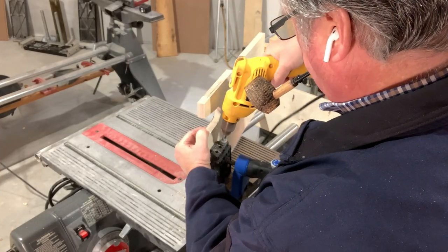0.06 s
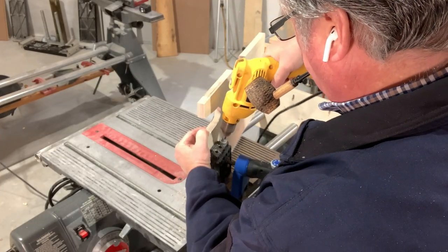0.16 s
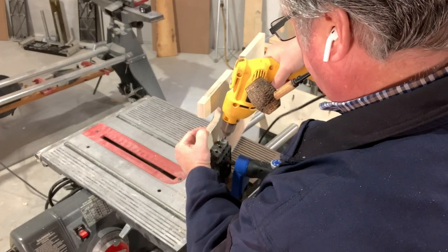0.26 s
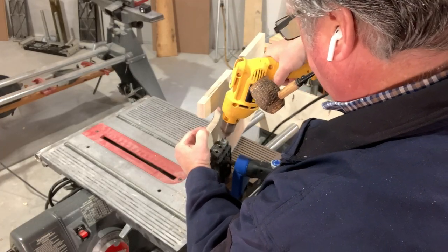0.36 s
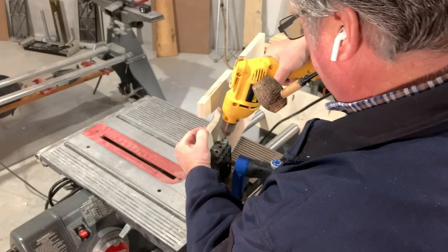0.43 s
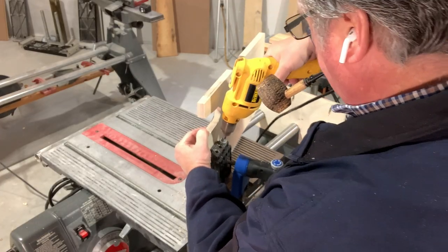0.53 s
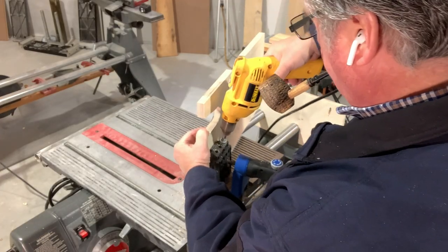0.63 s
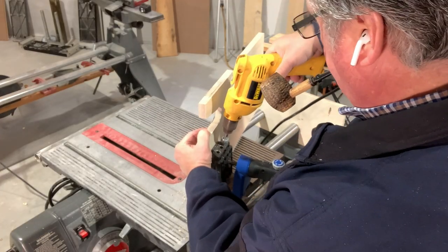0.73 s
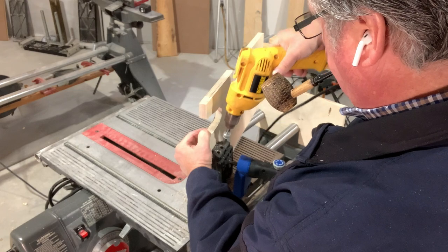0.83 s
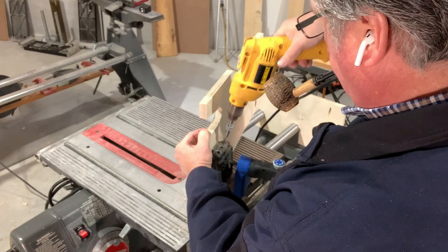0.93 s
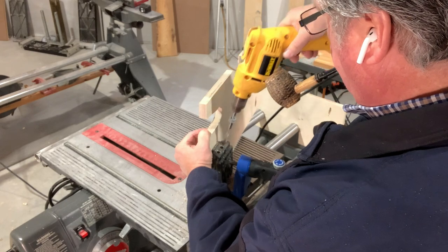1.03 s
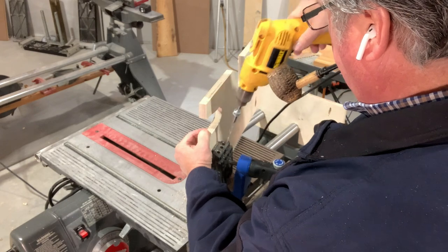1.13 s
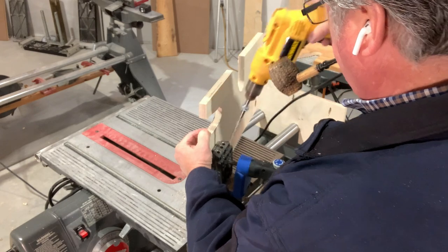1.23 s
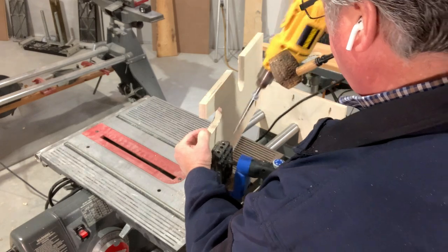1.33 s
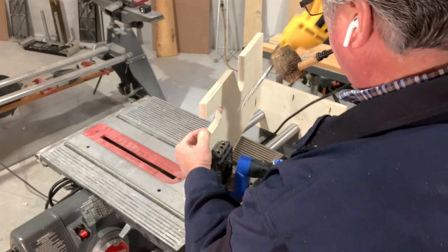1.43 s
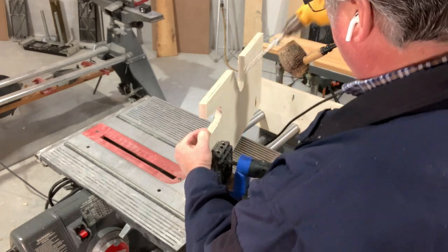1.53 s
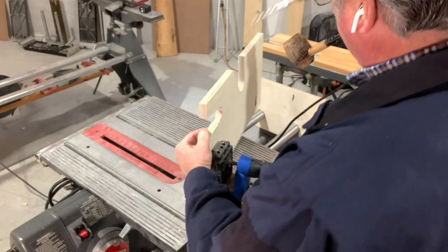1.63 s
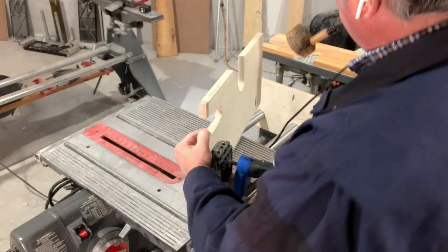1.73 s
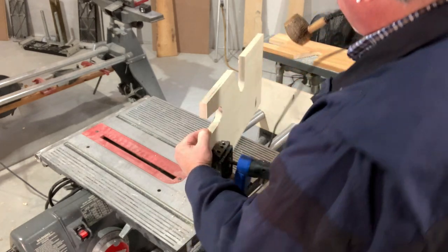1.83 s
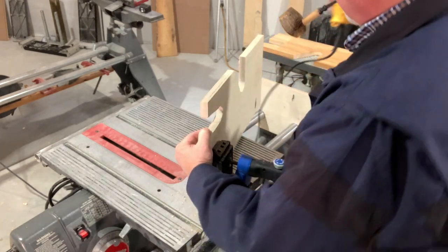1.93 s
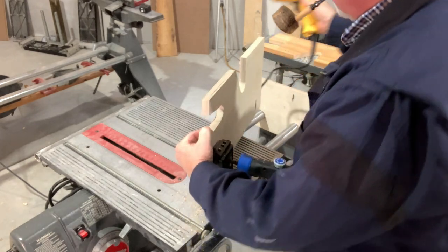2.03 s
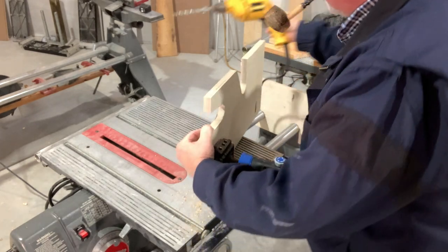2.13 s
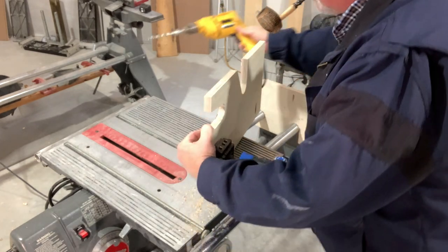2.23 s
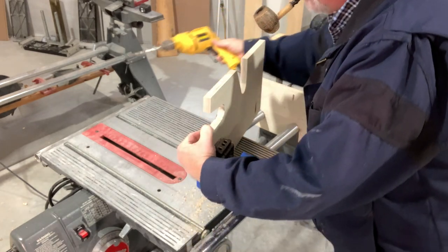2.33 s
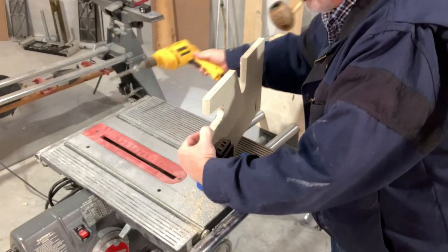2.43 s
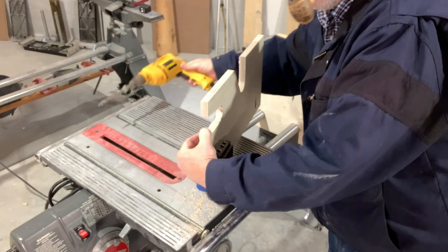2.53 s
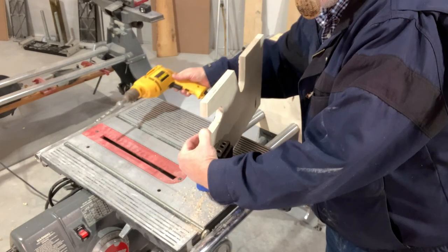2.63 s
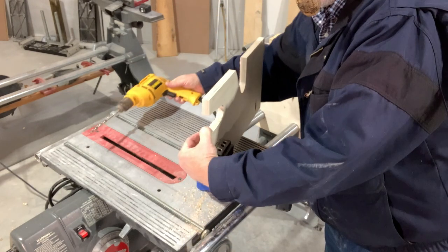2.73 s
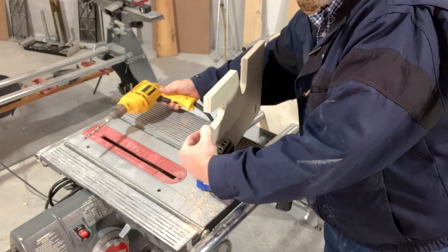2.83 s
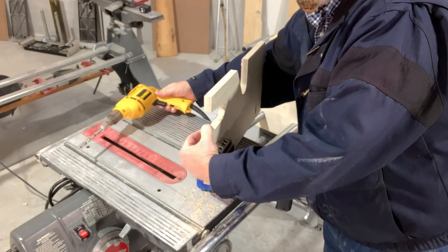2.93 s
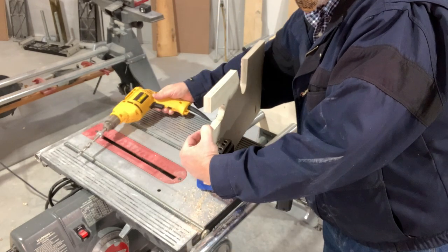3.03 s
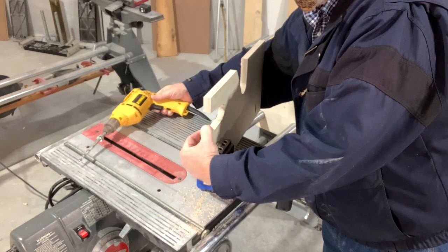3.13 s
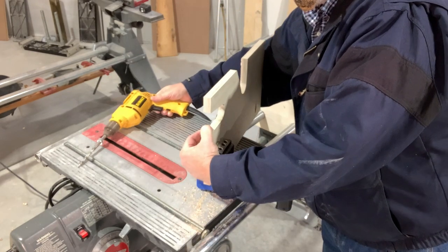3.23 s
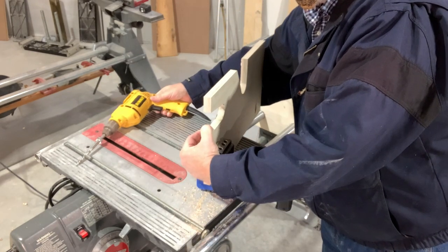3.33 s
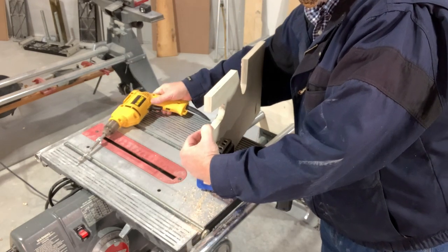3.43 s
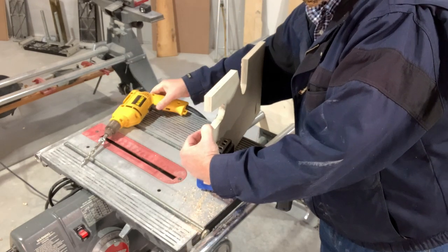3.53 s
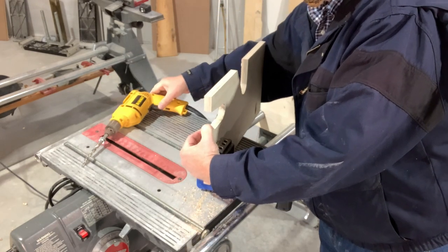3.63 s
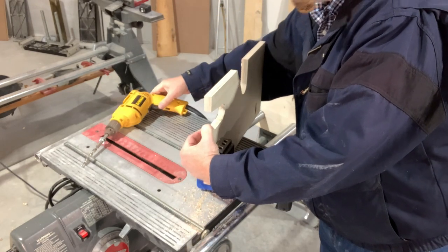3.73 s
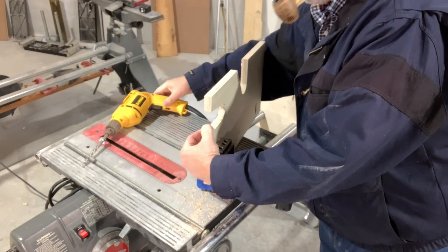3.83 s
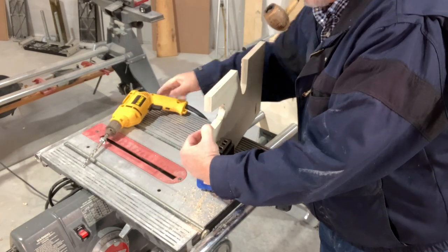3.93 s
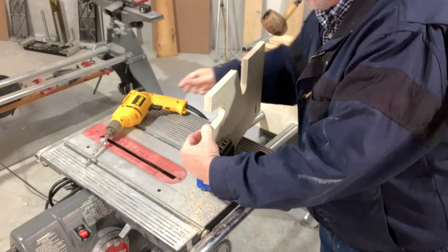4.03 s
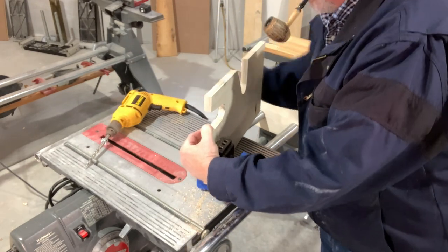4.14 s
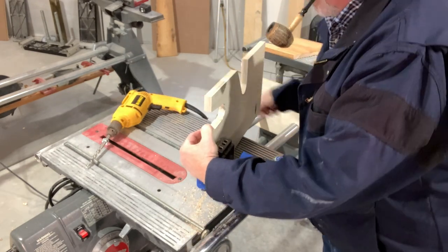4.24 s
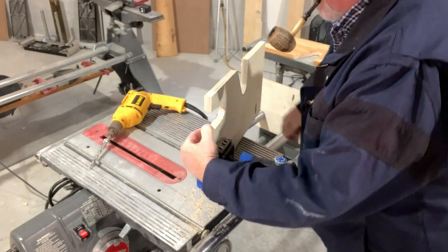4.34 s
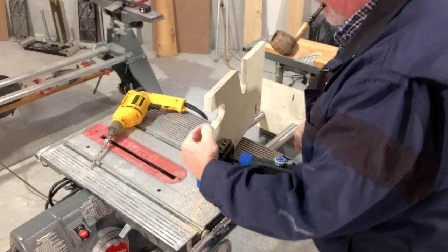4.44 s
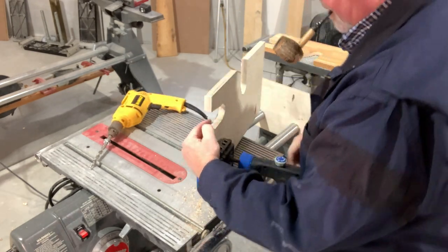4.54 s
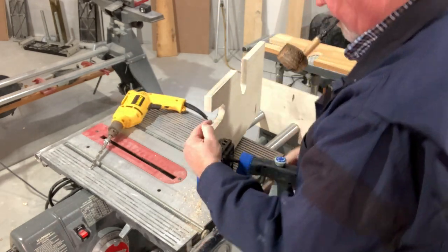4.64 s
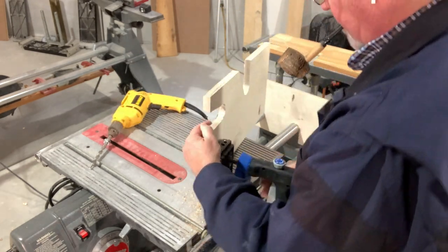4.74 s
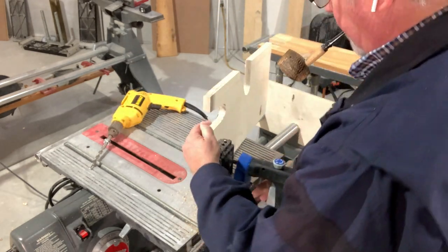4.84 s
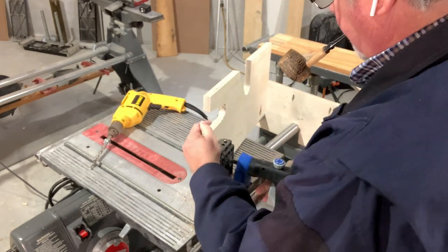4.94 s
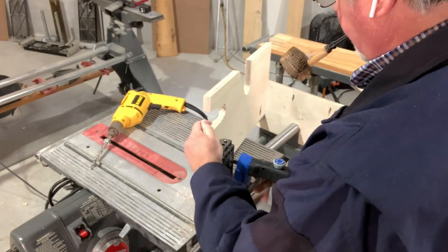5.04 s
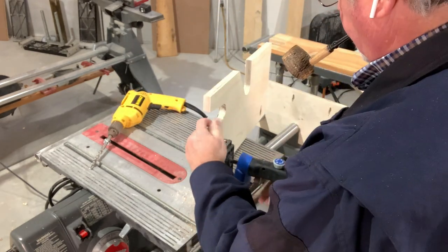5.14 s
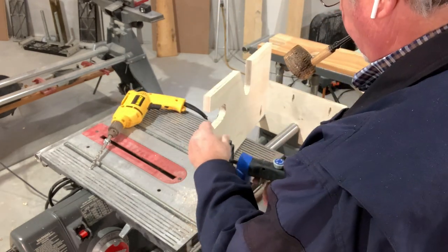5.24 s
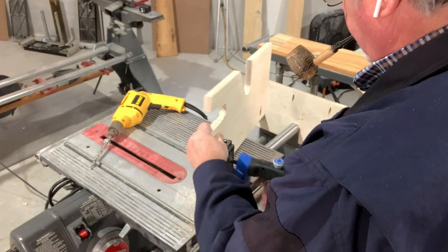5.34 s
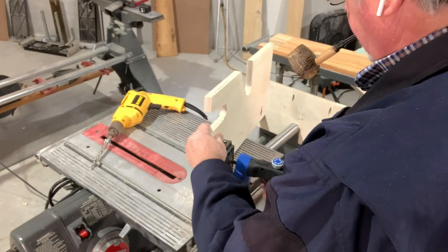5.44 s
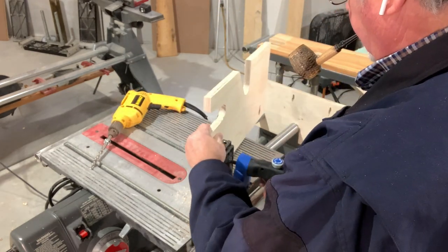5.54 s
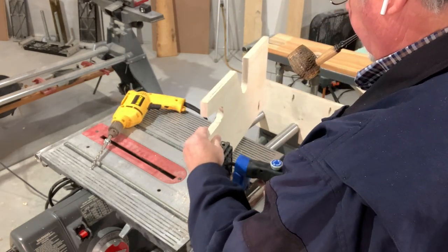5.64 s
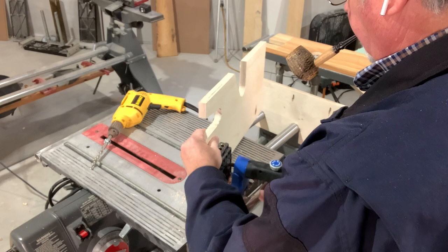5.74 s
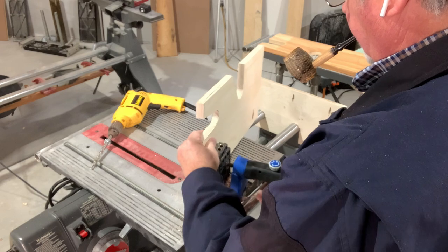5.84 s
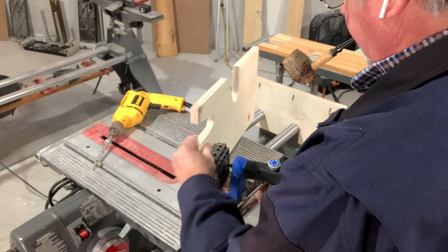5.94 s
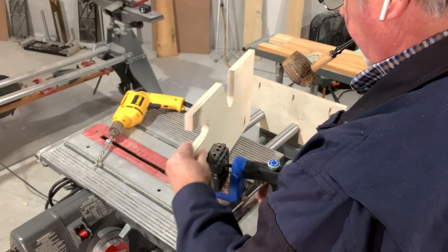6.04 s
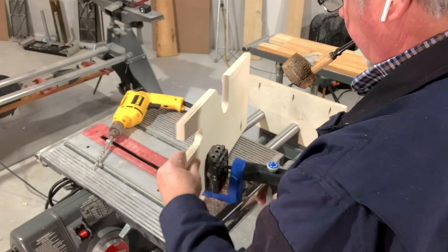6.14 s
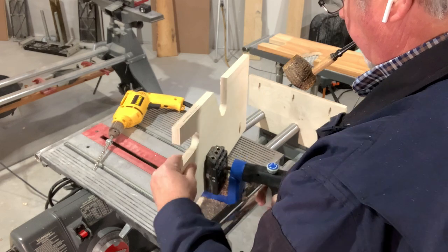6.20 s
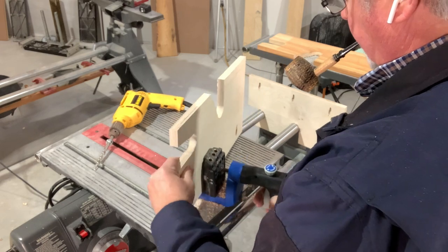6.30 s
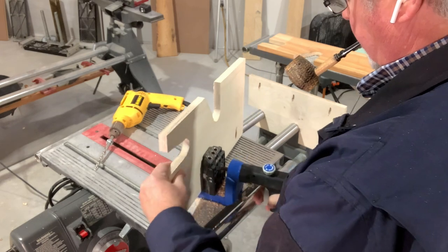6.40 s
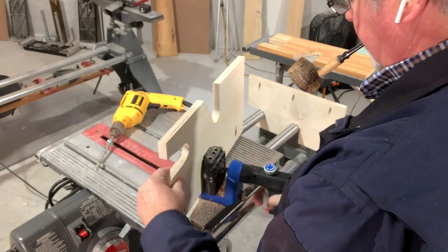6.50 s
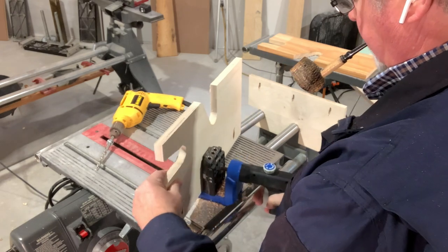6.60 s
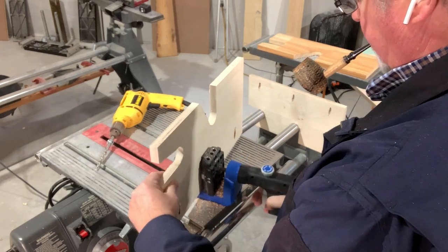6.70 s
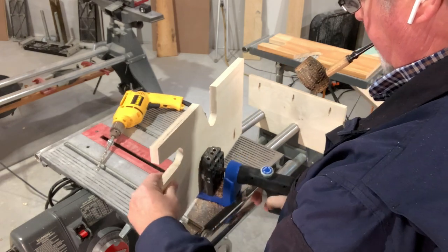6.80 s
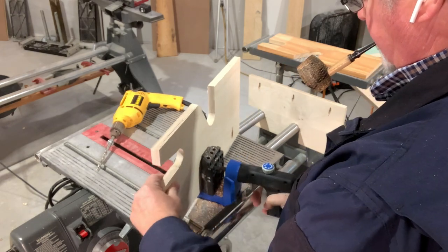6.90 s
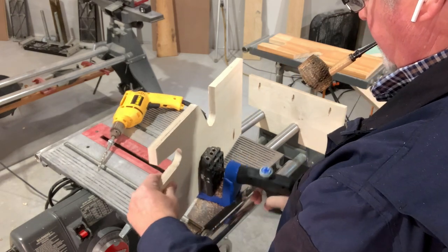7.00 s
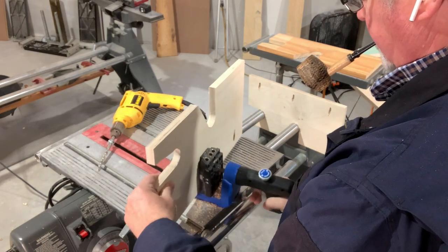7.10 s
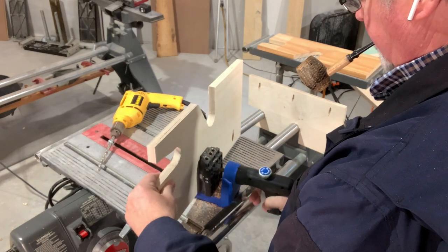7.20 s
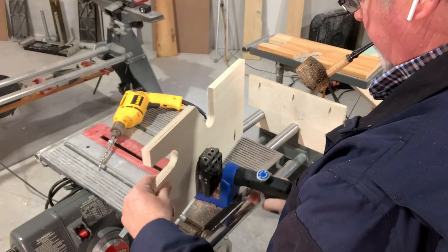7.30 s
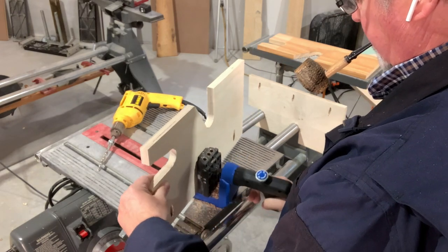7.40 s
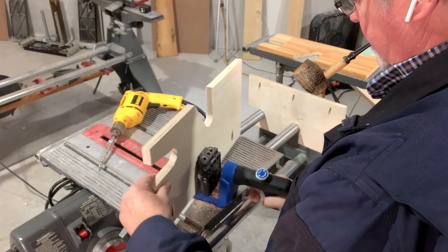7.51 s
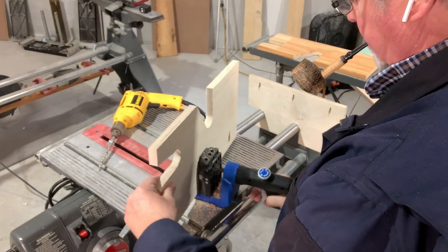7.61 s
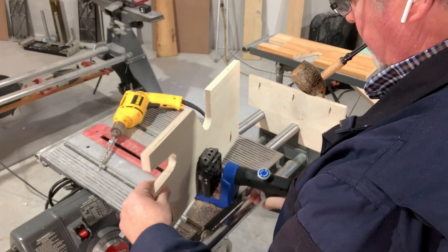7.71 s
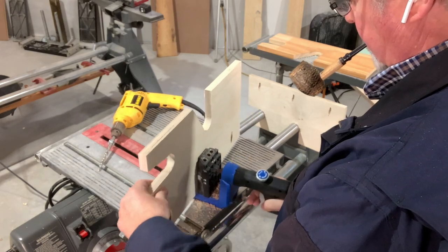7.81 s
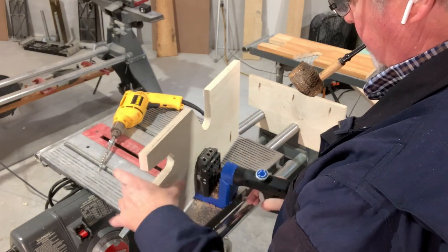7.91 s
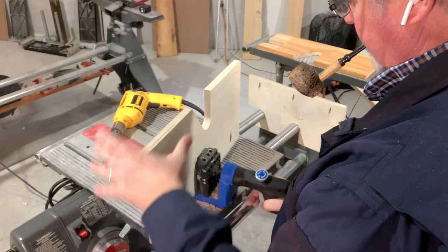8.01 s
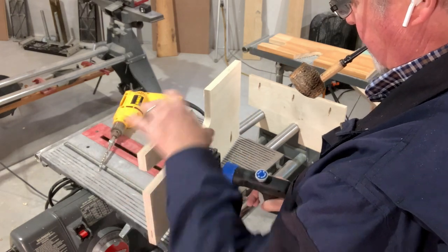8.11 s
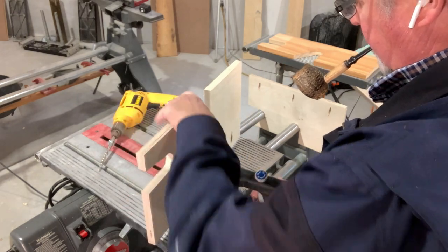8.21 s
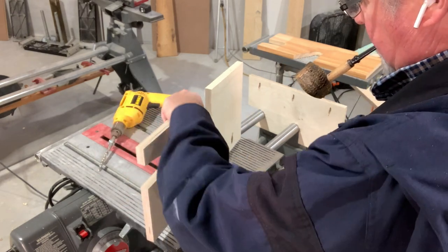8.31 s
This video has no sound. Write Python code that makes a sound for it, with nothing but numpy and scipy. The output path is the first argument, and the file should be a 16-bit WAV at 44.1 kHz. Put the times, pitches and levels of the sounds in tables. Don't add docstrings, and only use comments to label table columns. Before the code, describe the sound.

A corded drill finishes boring plywood, whines down and is laid on a metal table, then a clamp snaps and a board scrapes and knocks.

```python
import sys
import numpy as np
from scipy import signal
from scipy.fft import rfft, irfft
from scipy.io import wavfile
from scipy.ndimage import uniform_filter1d

SR = 44100
rng = np.random.default_rng(int(sys.argv[2]) if len(sys.argv) > 2 else 0)


def bounce(signal):
    frames = np.transpose(np.atleast_2d(signal))
    limited = np.clip(frames, -1, 1)
    pcm = np.round(limited * 32767).astype(np.int16)
    wavfile.write(sys.argv[1], SR, pcm)


def magnitude_from_level(level_db):
    exponent = np.asarray(level_db, float) / 20
    return 10 ** exponent


N = 368676
TRIGGER_OFF = 1.1

# frequency in Hz, level in dB per Hz.
AIR_SPECTRUM = [(5000, -26), (8000, -4.5), (12000, -3), (16000, -0.5)]


def evened(x):
    return x / np.sqrt(np.mean(x ** 2) + 1e-20)


def read(points, hz):
    f, value = np.transpose(points)
    return np.interp(np.log(hz + 1), np.log(f + 1), value)


def curves(rows, fade=.05):
    s, *columns = np.transpose(rows)
    t = np.arange(N) / SR
    since_start = t - s[0] + (s[0] < fade)
    until_end = s[-1] - t + (s[-1] > N / SR - fade)
    gate = np.clip(np.minimum(since_start, until_end) / fade, 0, 1)
    return [np.interp(t, s, c) for c in columns] + [gate]


def coloured(x, spectrum):
    gain = magnitude_from_level(read(spectrum, np.fft.rfftfreq(len(x), 1 / SR)))
    return evened(irfft(rfft(x) * gain, len(x)))


def noise():
    return rng.standard_normal(N)


def wander(size):
    return evened(uniform_filter1d(uniform_filter1d(noise(), size), size))


def resonate(x, modes):
    total = 0
    for hz, width, db in modes:
        b, a = signal.iirpeak(hz, hz / width, SR)
        total = total + magnitude_from_level(db) * evened(signal.lfilter(b, a, x))
    return evened(total)


def ring(modes, shorten):
    t = np.arange(SR // 3) / SR
    return sum(magnitude_from_level(db - 60 * t / (shorten * min(t60, .9))) * np.sin(2 * np.pi * hz * t)
               for hz, db, t60 in modes)


def shop(x, early_db=5, early_s=0.035):
    # frequency in Hz, t60 in s.
    decay = [(200, 1.6), (530, 1.1), (1390, 0.96), (3680, 0.68), (9700, 0.36)]
    taps = np.zeros(SR)
    at = np.arange(200, SR - 20, 20)
    taps[at + rng.integers(0, 20, len(at))] = rng.choice([-1., 1.], len(at))
    hz, t, z = signal.stft(taps, SR, nperseg=256)
    near_walls_db = early_db * np.exp(-t / early_s)
    z = z * magnitude_from_level(-60 * t / read(decay, hz)[:, None] + near_walls_db)
    tail = signal.istft(z, SR, nperseg=256)[1]
    return signal.fftconvolve(x, tail / np.linalg.norm(tail))[:N]


def background():
    # time in s, level in dB.
    rumble_levels = [(0.0, -50.5), (0.5, -51), (1.3, -56.5), (2.2, -50), (3.8, -56), (5.1, -48.5),
                     (5.95, -40), (7.5, -37), (8.36, -43.5)]
    # frequency in Hz, width in Hz, level in dB.
    room_modes = [(57, 42, 5.5), (98, 52, 0.5), (131, 8.3, -2), (40, 59, -9), (75, 42, -10.5)]
    # frequency in Hz, level in dB.
    fan_hum = [(58, 1), (93, -1)]
    # time in s, rise in dB.
    bumps = [
        (2.3, 6),
        (3.05, 11),
        (5.47, 3),
    ]
    # frequency in Hz, level in dB per Hz.
    hiss_spectrum = [(82, -34), (140, -1), (171, -14.5), (230, 0.5), (572, -14.5), (726, -10),
                     (1060, -18.5), (1190, -18), (14500, -39.5), (16000, -47)]
    hiss_db, bump_s = -56, 0.04
    hum_on_s, hum_before = 5.6, 0.21
    t = np.arange(N) / SR
    rumble_db, _ = curves(rumble_levels)
    rumble_db = rumble_db + sum(db * np.exp(-((t - s) / bump_s) ** 2) for s, db in bumps)
    hum = 0
    for hz, db in fan_hum:
        level = magnitude_from_level(db + 1.5 * wander(size=6000))
        hum = hum + level * np.sin(2 * np.pi * hz * t + .5 * wander(size=9000))
    share = hum_before + (.92 - hum_before) * np.clip((t - hum_on_s) / .3, 0, 1)
    boom = resonate(resonate(noise(), room_modes), room_modes)
    rumble = np.sqrt(1 - share ** 2) * boom + share * evened(hum)
    return magnitude_from_level(rumble_db - 3.0) * rumble + magnitude_from_level(hiss_db) * coloured(noise(), hiss_spectrum)


def drones():
    # start in s, end in s, first frequency in Hz, last frequency in Hz, level in dB.
    motors = [
        (1.2, 3.6, 70, 70, -54),
        (2.7, 5.6, 97, 97, -56),
        (5.6, 8.6, 128, 107, -50),
    ]
    t, out = np.arange(N) / SR, 0
    for start, end, first, last, db in motors:
        swell = np.clip(np.minimum(t - start, end - t) / .3, 0, 1)
        level = swell * magnitude_from_level(db + 3 + 2.5 * wander(size=4000))
        hz = np.interp(t, [start, end], [first, last])
        out = out + level * np.sin(2 * np.pi * np.cumsum(hz) / SR)
    return out


def rubs():
    # frequency in Hz, level in dB per Hz.
    scrape_spectrum = [(500, -33), (1500, -3), (2500, -3.5), (3100, 2), (3600, 0.5), (4600, -5),
                       (6800, -2.5), (10000, -13.5)]
    # loudest moment in s, swell in s, fade in s, fizz in dB, scrape over it in dB.
    strokes = [(3.236, .02, .02, -50, 14), (4.528, .018, .29, -63, 7), (4.74, .035, .14, -66, -6),
               (4.935, .01, .3, -64.5, 9.5), (5.07, .14, .3, -59, -12), (5.148, 0.15, .13, -53, 7.5),
               (5.334, .03, .055, -68, 6), (5.748, .075, .3, -63, 9.5), (5.99, .05, .6, -58, 11),
               (6.09, .03, .3, -61, 14), (6.16, .015, 1.2, -53, 3), (6.47, .1, .025, -61, 11),
               (6.516, .05, .075, -65, 12), (6.606, .03, .12, -58.5, 2.5), (6.812, .12, .085, -72.5, 15.5),
               (6.922, .04, .07, -66, 3), (7.09, .025, .04, -53.5, 5), (7.38, .03, .055, -61, 4.5),
               (7.448, .04, .065, -73, -2), (7.612, .012, .1, -63.5, 0), (7.706, .07, .025, -57.5, 3.5),
               (7.764, .013, .11, -67, 1), (8.36, .3, .1, -66, -4)]
    stroke_db = 20
    seated_s = 6.365
    grains = noise() * magnitude_from_level(2.6 * wander(size=60))
    fizz, scrape = coloured(grains, AIR_SPECTRUM), coloured(grains[::-1], scrape_spectrum)
    t = np.arange(0, N / SR, .002)
    s, swell, fade, fizz_db, scrape_db = np.transpose(strokes)[:, :, None]
    distance = np.maximum((s - t) / abs(swell), (t - s) / abs(fade))
    pressure = magnitude_from_level(fizz_db - stroke_db * distance)
    pressure *= (s > seated_s) | (t < seated_s)
    bright = np.interp(np.arange(N) / SR, t, np.linalg.norm(pressure, axis=0))
    dull = np.interp(np.arange(N) / SR, t, np.linalg.norm(pressure * magnitude_from_level(scrape_db), axis=0))
    dry = bright * fizz + dull * scrape
    return dry + .4 * shop(dry)


def blows():
    # weight under 1.8 kHz in dB, crack to 6 kHz in dB, tick above in dB.
    hits = [(2.238, -17, -25, -35.5, -50), (2.268, -20, -32.5, -30.5, -55), (2.359, -20, -43.5, -28, -36),
            (2.96, -13.5, -28, -28, -46.5), (3.27, -6, -41.5, -19, -18.5), (3.307, -31, -39.5, -33, -33),
            (3.58, -16, -30, -29.5, -55.5), (4.527, -41, -50.5, -45, -45.5), (4.723, -43, -48, -49, -61),
            (4.751, -41, -50, -50, -64), (5.085, -48, -57, -44.5, -45), (5.127, -43, -46.5, -58, -65),
            (5.405, -8.5, -15, -17, -17), (5.748, -56, -46.5, -43.5, -51), (5.843, -4.5, -13, -17, -20),
            (6.064, -21.5, -32.5, -32.5, -33), (6.248, -29, -42, -40.5, -64),
            (6.385, -15.5, -22.5, -28.5, -30), (6.939, -50, -50, -62, -71), (7.098, -49, -44, -50, -58.5),
            (7.207, -46, -52.5, -67.5, -79), (7.376, -54, -48, -57, -61), (7.701, -35, -49.5, -48.5, -59),
            (8.322, -41, -53.5, -49.5, -57)]
    # frequency in Hz, level in dB, t60 in s.
    board_modes = [(321, 7, 5.0), (493, -6.5, 0.41), (785, 9.5, 5.0), (1000, 10, 0.2), (1078, -12.5, 0.18),
                   (1308, -14, 0.3), (1798, -32, 5.0), (2132, -15, 0.28)]
    # low edge in Hz, high edge in Hz.
    bands = [(230, 600), (600, 1750), (1750, 6000), (6000, 15300)]
    rattle_s = [0.0075, 0.005, 0.0037, 0.0087]
    fuller = [4, 4, 1, 1.5]
    thud_db = -4.5
    direct, push, t = np.zeros(N + SR), np.zeros(N + SR), np.arange(SR // 8) / SR
    rise = 1.1 - np.exp(-t / .003)
    board = ring(board_modes, shorten=0.11)[:len(t)]
    soft = signal.butter(2, 9500, fs=SR, output="sos")
    filters = [np.vstack([signal.butter(3, edges, "band", fs=SR, output="sos"), soft]) for edges in bands]
    for s, peak_db, body_db, crack_db, tick_db in hits:
        at = slice(round(s * SR), round(s * SR) + len(t))
        chance = rng.random((2, len(t)))
        clicks = (chance[0] < 1200 / SR) * np.sign(chance[1] - .5) + 0.093 * (chance[1] - .5)
        levels_db = [body_db + thud_db, body_db, crack_db, tick_db]
        blow = magnitude_from_level(levels_db[0] - 27.0) * board
        for db, fuller_db, band, length in zip(levels_db, fuller, filters, rattle_s):
            rattle = signal.sosfilt(band, clicks * np.exp(-t / length) * rise)
            blow += magnitude_from_level(db + fuller_db) * rattle / np.linalg.norm(rattle)
            impulse = signal.sosfilt(band, signal.unit_impulse(len(t)))
            push[at] += magnitude_from_level(db + 23.5) * impulse / np.linalg.norm(impulse)
        direct[at] += magnitude_from_level(peak_db) * blow / abs(blow).max()
    return direct[:N], push[:N]


def struck_metal():
    # frequency in Hz, level in dB, t60 in s.
    table_modes = [(214, -8.5, 0.25), (1105, -8, 0.93), (1106, -16, 0.6), (2940, 10, 0.1), (4920, -13, .12),
                   (6400, -4.5, 0.12), (7400, -10.5, 0.26), (8820, -6, .1)]
    # time in s, level in dB.
    table_hit = (3.269, -22)
    # frequency in Hz, level in dB, t60 in s.
    jig_modes = [(662, 0, .4), (2190, -7, .45), (385, 0, .3), (310, 2, .3)]
    # time in s, level in dB.
    jig_hits = [(2.245, -33), (2.27, -33), (2.965, -38), (5.848, -26), (6.066, -33.5), (6.388, -27.5),
                (4.74, -56), (6.525, -45), (7.715, -54.5)]
    table, jig = ring(table_modes, shorten=0.75), ring(jig_modes, shorten=0.79)
    out = np.zeros(N + SR)
    for body, (s, db) in [(table, table_hit)] + [(jig, hit) for hit in jig_hits]:
        out[round(s * SR):][:len(body)] += magnitude_from_level(db) * body
    return out[:N]


def struck_room(push):
    # frequency in Hz, width in Hz, level in dB.
    wood_modes = [(321, 52, 5.5), (380, 35, 2), (484, 51, 4), (660, 27, 1.5), (853, 140, 5),
                  (1165, 50.7, -2.5), (2182, 65, -2.5), (2743, 250, 5), (3400, 140, -1.5)]
    # frequency in Hz, width in Hz, level in dB.
    clamp_modes = [(880, 75, 4.5), (1220, 79, -1), (1573, 45, -1.5), (2080, 23, -18), (2460, 140, -7.5),
                   (3260, 54, -12)]
    clamp_opens = (5.39, 5.42)
    first, last = (round(s * SR) for s in clamp_opens)
    clamp = np.zeros(N)
    clamp[first:last] = push[first:last]
    ringing = 0
    for x, modes in [(push - clamp, wood_modes), (clamp, clamp_modes)]:
        ringing = ringing + .8 * x + .5 * np.std(x) * resonate(x, modes)
    return shop(ringing)


def rocking():
    # time in s, level in dB.
    hum_levels = [(3.2, -64), (3.3, -44.5), (3.45, -36), (3.58, -40.5), (3.75, -52)]
    # frequency in Hz, width in Hz, level in dB.
    top_modes = [(225, 50, 0), (1110, 14, -6), (2330, 60, -8), (2910, 40, -3)]
    level_db, lying = curves(hum_levels)
    return lying * magnitude_from_level(level_db) * resonate(noise(), top_modes)


def knocks():
    direct, push = blows()
    return direct + struck_metal() + struck_room(push) + rocking()


def speed():
    # time in s, armature turns per s.
    loaded = [(0, 443.6), (.12, 426), (.3, 389.5), (.45, 383.5), (.6, 387.5), (.83, 406), (1.02, 429.5),
              (1.09, 429.5), (1.2, 395.8)]
    friction, air_drag = 105, 8.6e-4
    t, (s, turns) = np.arange(N) / SR, np.transpose(loaded)
    even = np.sqrt(friction / air_drag)
    angle = np.arctan(turns[-1] / even) - air_drag * even * (t - s[-1])
    coast = even * np.tan(np.maximum(angle, .01))
    return np.where(t < s[-1], np.interp(t, s, turns), coast)


def whine():
    # frequency in Hz, level in dB.
    fan_vents = [(2000, -44), (2800, -38), (3950, -37), (4300, -26), (4600, -22), (4990, -26), (5200, -33),
                 (5600, -24)]
    tones_end = (2.3, 3.2)
    shaft_db, shaft_db_per_decade, slot_db = -37, 65, -35
    octave_below_fan_db, third_below_octave_db, full_sink_db, mesh_db = -6, -13, 26, -31
    t, rate = np.arange(N) / SR, speed()
    gate = np.clip((tones_end[1] - t) / (tones_end[1] - tones_end[0]), 0, 1)
    turns = np.cumsum(uniform_filter1d(rate, size=1500) * (1 + .0008 * wander(size=300))) / SR
    sink_db = full_sink_db * np.clip((t - TRIGGER_OFF - .15) / .6, 0, 1)
    fan_db = read(fan_vents, 13 * rate)
    octave_db = fan_db + octave_below_fan_db - .8 * sink_db
    turning_db = shaft_db + shaft_db_per_decade * np.log10(rate / rate[0])
    orders = [(1, turning_db), (12, slot_db - sink_db), (13, fan_db), (26, octave_db),
              (39, octave_db + third_below_octave_db)]
    tones = 0
    for order, db in orders:
        tones = tones + np.sqrt(2) * magnitude_from_level(db + 2.6 * wander(size=500)) * np.sin(2 * np.pi * order * turns)
    mesh = np.sin(2 * np.pi * 8 * turns + 1.2 * wander(size=150))
    tones = gate * tones + magnitude_from_level(mesh_db - sink_db + 3 * wander(size=1500)) * mesh
    return 0.95 * tones + 0.3 * shop(tones), turns


def gear_rattle(turns):
    # frequency in Hz, level in dB per Hz.
    powered = [(59, -57.5), (100, -21), (244, -19.5), (302, -8.5), (350, -13), (398, -11), (558, -9.5),
               (1200, -1.5), (3190, -4.5), (4200, -4), (4980, -1), (14700, -10), (16000, -29)]
    # frequency in Hz, level in dB per Hz.
    coasting = [(120, -60), (200, -33.5), (263, -17), (340, -19), (590, -11), (1180, -1.5), (1560, -7),
                (1940, -7.5), (2330, -9.5), (3560, -8), (5520, -7.5), (14600, -15.5), (16000, -12)]
    # frequency in Hz, width in Hz, level in dB.
    gearbox_modes = [(1140, 260, -4.5), (1290, 40, -16.5), (1908, 330, 0), (2730, 740, 0),
                     (3114, 1300, 3.5), (7140, 920, -2)]
    strong = magnitude_from_level(8.6 * np.minimum(rng.exponential(1, N), 2.8)) * (rng.random(N) < 1500 / SR)
    throb = 1 + 0.067 * np.cos(2 * np.pi * turns)
    teeth = noise() * throb + 0.13 * evened(strong * np.sign(noise()))
    teeth = evened(teeth * magnitude_from_level(0.5 * wander(size=500)))
    free = np.clip((np.arange(N) / SR - TRIGGER_OFF) / 0.36, 0, 1)
    rattle = np.sqrt(1 - free) * coloured(teeth, powered)
    rattle += np.sqrt(free) * coloured(teeth[::-1], coasting)
    return evened(rattle + .5 * resonate(rattle, gearbox_modes))


def brush_hops():
    # time in s, level in dB.
    ticks = [(3.0182, -36), (3.1868, -52), (3.2297, -60), (3.2681, -39), (3.3559, -40), (3.3943, -33),
             (3.4143, -43), (3.4327, -34), (3.4596, -39), (3.4851, -43), (3.513, -45), (3.544, -28),
             (3.5807, -28), (3.5988, -29), (3.6238, -31), (3.6787, -34)]
    hops = np.zeros(N)
    for s, db in ticks:
        hops[round(s * SR)] = magnitude_from_level(db - 2)
    return signal.lfilter([1], [1, -.99], hops)


def boring():
    # time in s, level in dB.
    cutting_levels = [(0, -40), (.2, -38), (.5, -34), (.75, -40), (1.2, -53.5)]
    # frequency in Hz, width in Hz, level in dB.
    shaken_modes = [(209, 8, -5), (275, 8, -6), (307, 7, 0), (345, 8, -7), (479, 16, 3)]
    level_db, cutting = curves(cutting_levels)
    return cutting * magnitude_from_level(level_db) * resonate(noise(), shaken_modes)


def near_table(x):
    # time in s, delay in ms, share of the direct sound.
    table_echo = [(0, 1.06, 0.098), (1.2, 2.1, 0.036), (2.2, 1.7, 0.16), (2.5, 1.06, 0.068),
                  (3.25, .35, 0.15), (3.95, 0.44, 0.27)]
    delay_ms, share, _ = curves(table_echo)
    echo = np.interp(np.arange(N) - delay_ms * SR / 1000, np.arange(N), x)
    return (x + share * echo) / np.sqrt(1 + share ** 2)


def drill():
    # time in s, gear rattle in dB, cooling air in dB (loud when the vents face the microphone).
    drill_levels = [(0.0, -18, -14), (0.53, -19.5, -28), (1.15, -18.3, -18), (1.5, -24, -50.5),
                    (2.29, -29.5, -25.5), (2.56, -31.5, -25), (3.23, -34, -37), (3.53, -37.5, -68.5)]
    rattle_db, air_db, _ = curves(drill_levels)
    gate = magnitude_from_level(-92 * np.maximum(np.arange(N) / SR - drill_levels[-1][0], 0))
    tones, turns = whine()
    air = (magnitude_from_level(air_db - 6) + brush_hops()) * coloured(noise(), AIR_SPECTRUM)
    body = magnitude_from_level(rattle_db + 0.5) * gear_rattle(turns) + air
    return tones + gate * near_table(body) + boring()


def scene():
    mono = background() + drones() + rubs() + knocks() + drill()
    return np.array([mono, mono])


def low_pass(x):
    return signal.sosfilt(signal.butter(12, 16510, fs=SR, output="sos"), x)


def record(dry):
    lowpass = signal.firwin(511, 15830, window=("kaiser", 9), fs=SR)
    limited = signal.oaconvolve(dry, lowpass[None], "same")
    return low_pass(limited)


dry = scene()
out = record(dry)
bounce(out)
```